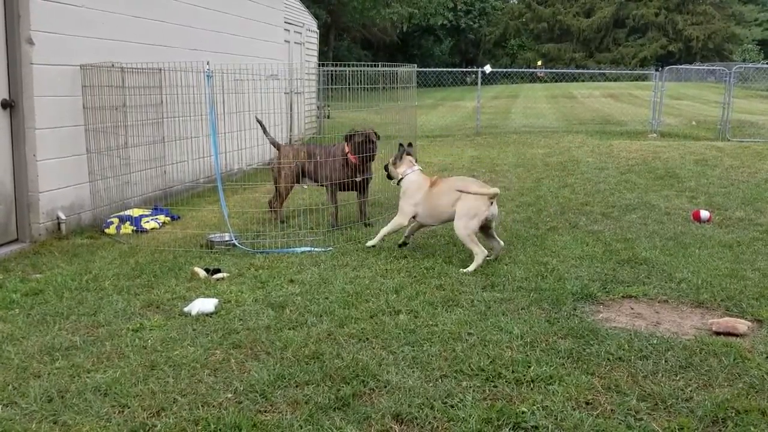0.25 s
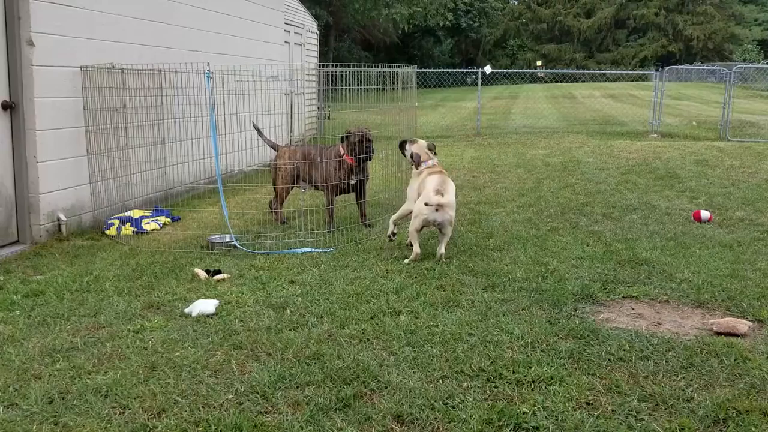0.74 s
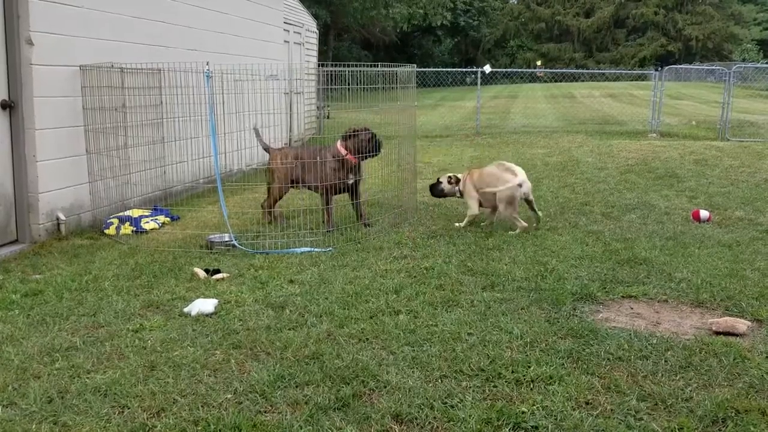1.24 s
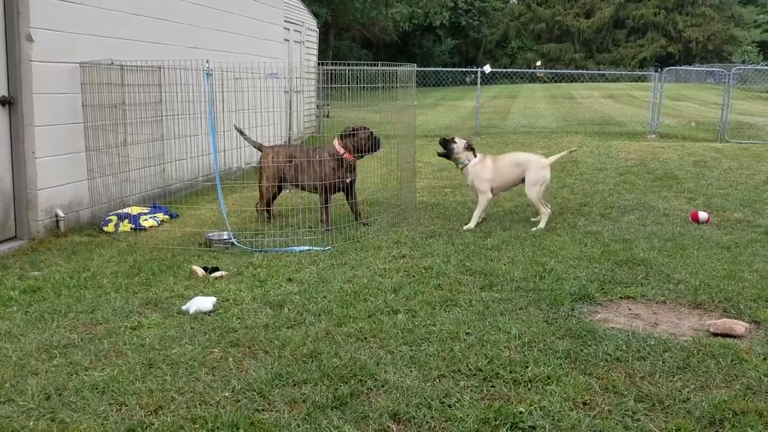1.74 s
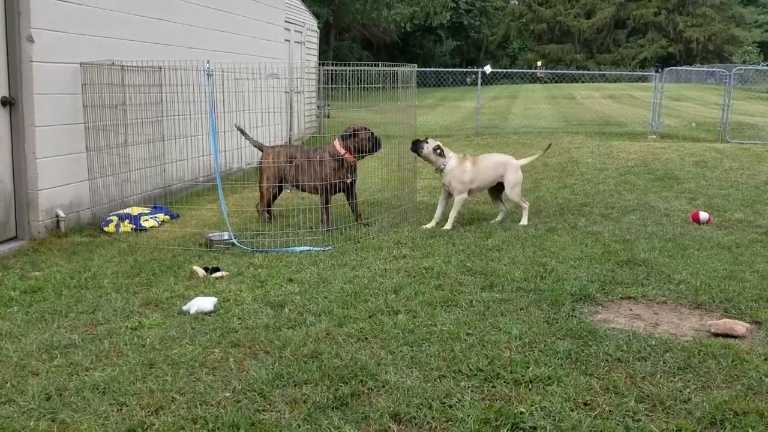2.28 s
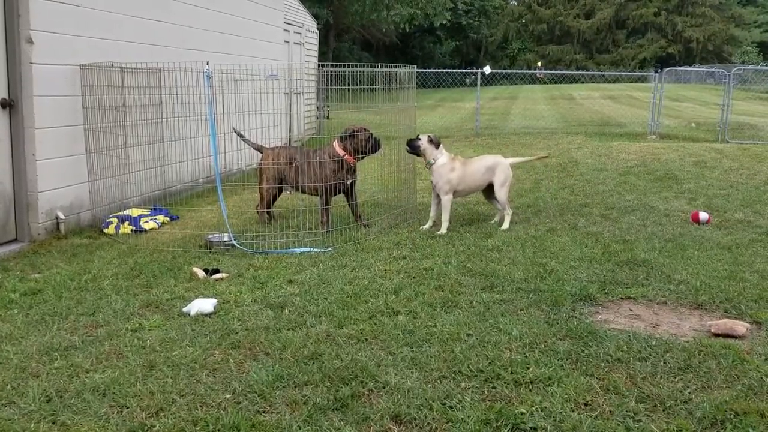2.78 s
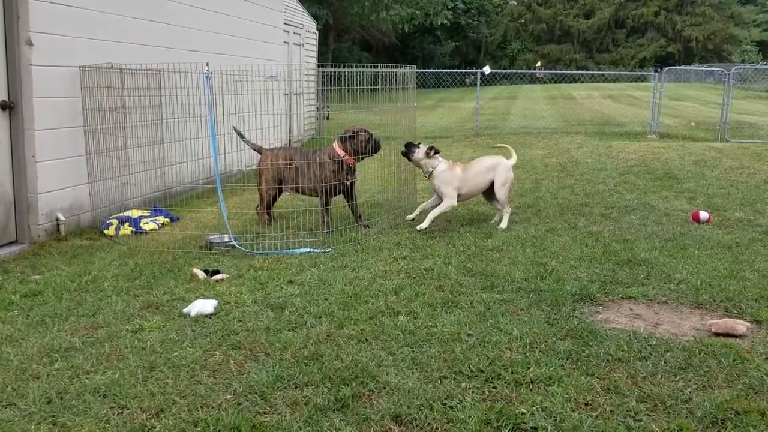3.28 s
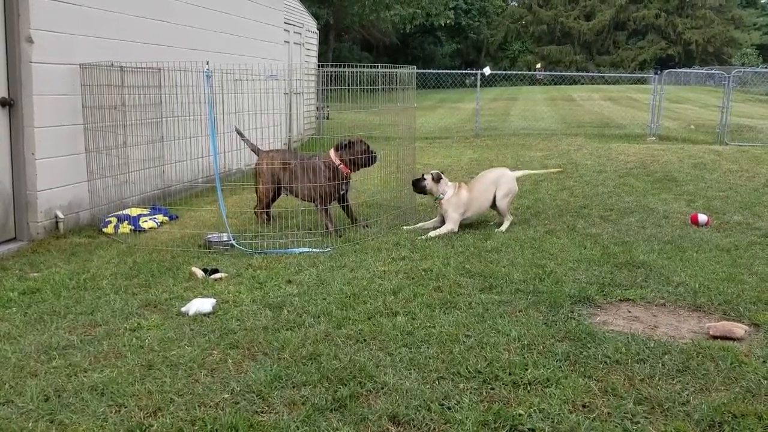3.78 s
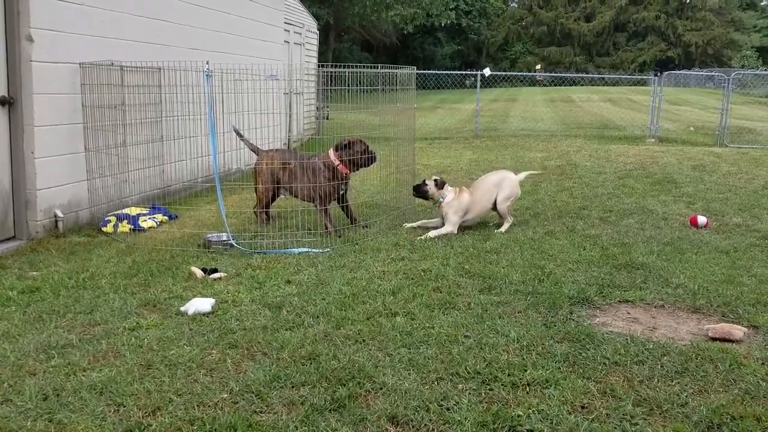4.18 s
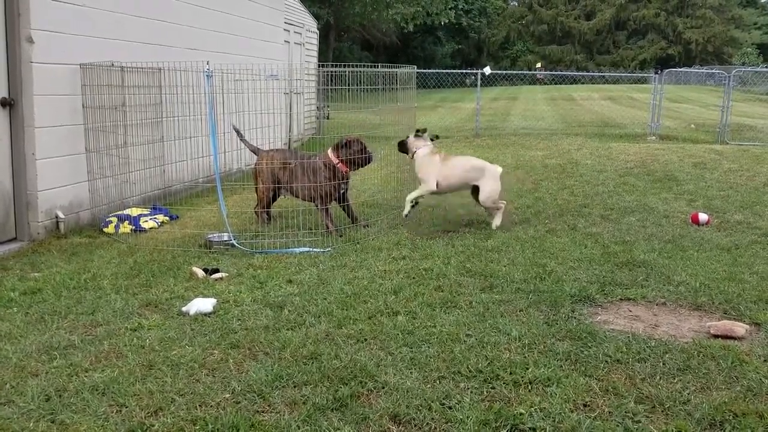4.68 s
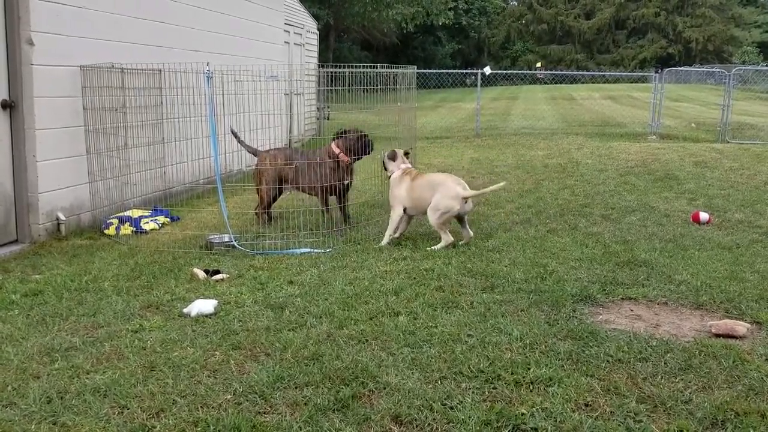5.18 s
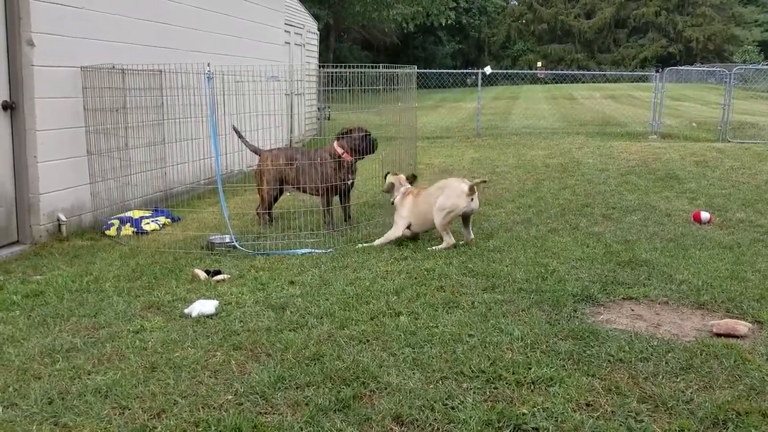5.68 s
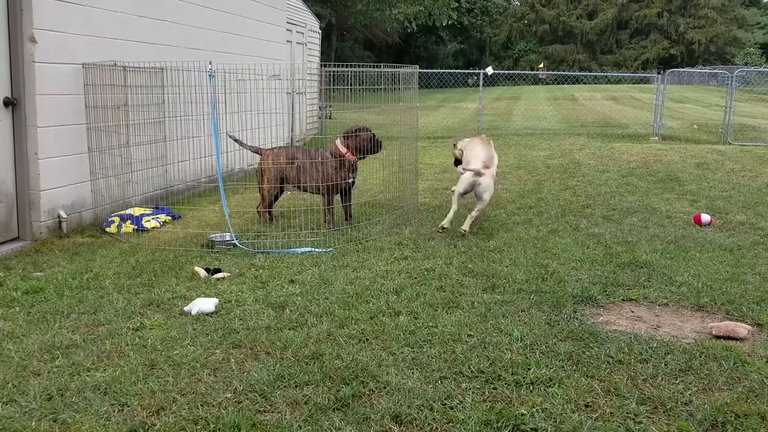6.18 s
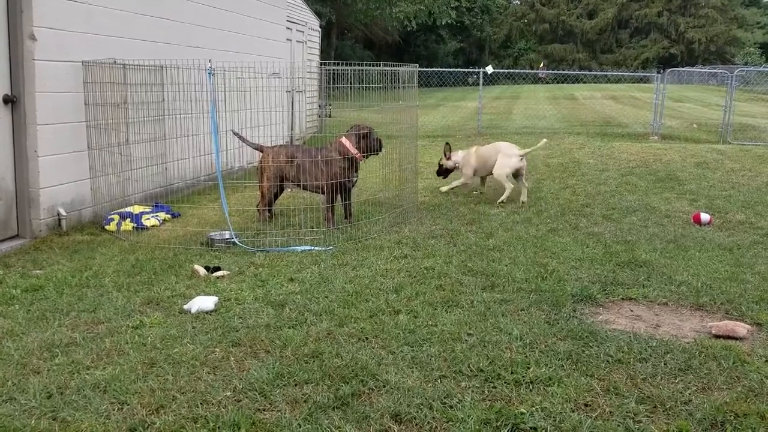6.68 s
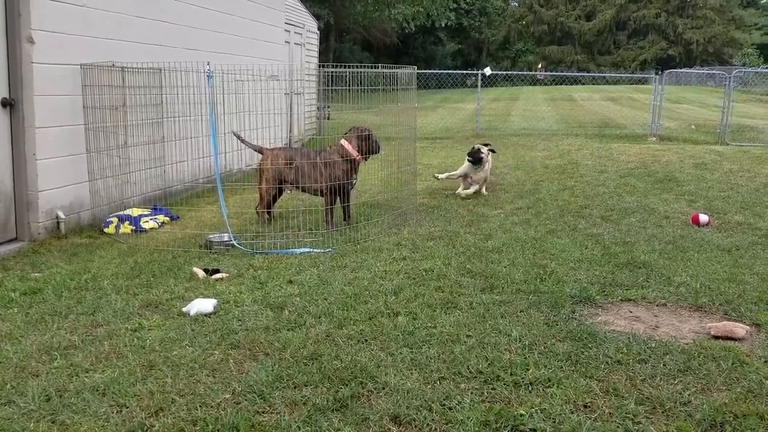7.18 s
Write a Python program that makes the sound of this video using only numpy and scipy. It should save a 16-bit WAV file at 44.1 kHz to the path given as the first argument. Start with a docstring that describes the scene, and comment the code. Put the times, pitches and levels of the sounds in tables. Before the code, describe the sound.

A large dog gives three deep, loud barks about a second apart in an open yard, echoing off trees over faint chirping birds.

```python
"""Grassy yard beside a shed wall: murmur, leaf hiss and a thin whine; a small bird chirps in threes, dogs huff.
A large dog barks three times: each bark opens as chaotic rasp and settles into a ringing harmonic note.
Wall, fence and trees throw the barks back. Paws swish through grass as bursts of grainy noise.
A jay cries in sagging harmonics, a far engine's noise rumble swells, and late on the whine weakens."""
import sys
import numpy as np
from scipy import signal
from scipy.fft import rfft, irfft
from scipy.io import wavfile
from scipy.ndimage import uniform_filter1d

SR = 44100
rng = np.random.default_rng(int(sys.argv[2]) if len(sys.argv) > 2 else 0)


def wrap_up_sound(samples):
    """Save the sound to the file named by the first command line argument, as 16-bit audio."""
    columns = np.atleast_2d(samples).T
    # keep every value between -1 and 1, then stretch to whole-number steps
    tamed = np.clip(columns, -1, 1)
    steps = np.round(tamed * 32767).astype(np.int16)
    wavfile.write(sys.argv[1], SR, steps)


N = 328104
TIME_S = np.arange(N) / SR

# left-right likeness of sound from all around: freq_hz, likeness [0-1]
LIKENESS = [(30, 0.9), (70, 0.92), (170, 0.98), (380, 0.85), (950, 0), (2400, 0), (6000, 0)]
# outdoor murmur: freq_hz, relative_db_per_hz; then time_s, level_db
MURMUR_COLOUR = [(20, -28.5), (40, -7), (62, -15.5), (80, -15), (106, 0), (135, -18.5), (185, -3.5),
                 (255, 3.5), (330, -6), (480, -8.5), (760, -13.5), (1050, -22), (2500, -32.5),
                 (4000, -54.5)]
MURMUR_LEVEL = [(0, -46), (1.4, -49), (2.8, -56), (4, -48.5), (7.44, -48)]
# leaf hiss: freq_hz, relative_db_per_hz; then time_s, level_db
HISS_COLOUR = [(500, -3.5), (2500, 0), (3500, 0), (6000, -2), (8100, -1), (9200, -10.5), (12700, -9),
               (13600, -18), (15500, -14.5)]
HISS_LEVEL = [(0, -62), (2.7, -67.5), (3.5, -66.5), (7.44, -66.5)]
# far engine: freq_hz, relative_db_per_hz; then time_s, level_db
RUMBLE_COLOUR = [(20, -31), (35, -12.5), (60, -3), (80, -10), (115, -1.5), (140, -8.5), (175, 3),
                 (215, 3.5), (275, -2), (380, -24.5), (600, -21), (1000, -34), (2500, -38), (4000, -62.5)]
RUMBLE_LEVEL = [(1.5, -59), (1.61, -52), (2.14, -42), (2.87, -45), (3.73, -35.5), (5.37, -37.5), (5.7, -38),
                (6.73, -39), (7.44, -38)]

# small bird's three-note phrases: first_note_s
PHRASES = [.096, 0.605, 1.083, 1.509, 2.08, 2.691, 3.275, 3.798, 4.173, 4.607, 5.061, 5.538, 6.022, 6.502,
           7.023]
# notes of a phrase: after_first_s, top_pitch_hz, relative_db
NOTES = [(0, 4670, -12), (0.049, 4760, -5.5), (0.099, 4800, -4.5)]
# slow drift of the song: time_s, level_db
SONG_LEVEL = [(0, -50), (2.8, -55), (4.5, -51), (7.44, -53.5)]

# dogs' huffs: peak_s, length_s, resonance_hz, width_hz, level_db
HUFFS = [(0.13, 0.033, 1220, 129, -52.5), (0.297, .16, 1110, 130.4, -55), (1.711, 0.17, 1015, 153.5, -55),
         (4.11, .1, 1075, 127.5, -58), (4.992, .08, 1086, 70, -48), (6.251, .12, 1384, 294, -55),
         (6.668, .12, 2200, 780, -55), (7.035, .1, 1620, 350, -48.5)]

# barks: start_s; then, from start, voice_full_s, rasp_clears_s, mouth_widest_s, voice_stops_s, rasp_full_s;
# top_pitch_hz, voice_db, rasp_db, open_mouth_lift_db, open_brightness_db,
# upper resonance: in_rasp_hz, in_note_hz
BARKS = [(.972, 0.047, .067, .09, .13, .04, 473.2, -9.5, -17, 14.6, 9.2, 1728, 1440),
         (2.123, .043, .066, .089, .104, .028, 483, -17.5, -15.5, 23.5, 20.2, 1568, 2350),
         (3.173, .039, .04, .082, 0.11, .022, 459, -13.5, -21.5, 10.5, 6.1, 1357, 1398)]
# throat colour on the harmonics: freq_hz, gain_db
THROAT = [(450, -2), (900, -10), (1380, -15.5), (1820, -29.5), (2300, -23.5), (2750, -37), (3250, -34),
          (3700, -45), (4500, -54.5), (6000, -48), (8000, -49.5), (9500, -58.5), (15000, -59)]
# throat colour on the rasp: freq_hz, gain_db
RASP_COLOUR = [(100, -20), (250, -17), (430, -0.5), (620, 4.5), (800, 5.5), (1200, 7), (1750, 1.5),
               (2050, -4), (2550, 1), (3100, -21), (4500, -45), (6000, -20.5), (8000, -30), (9500, -49.5),
               (15000, -51)]
# two microphone ports, for sound from the dogs: freq_hz, left_lead_rad
PORT_PHASE = [(0, -0.5), (450, .45), (700, 1.5), (950, .7), (1200, 1.56), (1550, 2.4), (1800, 4.5),
              (2400, 4.5), (2900, 5.5), (4000, 7.5), (6000, 9), (8000, 7), (15000, 26.5)]
# same ports: freq_hz, left_minus_right_db
PORT_BALANCE = [(200, 1), (700, 0), (1300, 0), (1800, 6.5), (2400, 2.5), (4400, -0.5), (8000, 5.5),
                (15000, -4)]
# single reflections: delay_s, left_db, right_db
ECHOES = [(0.0122, -18, -34), (0.027, -42, -32), (.098, -29, -39.5)]
# near scatter: freq_hz, level_db; then freq_hz, t60_s
NEAR_COLOUR = [(200, -31), (450, -21.5), (950, -17), (1500, -17), (2400, -3.5), (7000, -4), (15000, -5)]
NEAR_T60 = [(300, 0.75), (2400, 0.19), (12000, 0.093)]
# far trees: freq_hz, level_db; then freq_hz, t60_s
TREES_COLOUR = [(200, -35.5), (450, -31), (950, -29.5), (1400, -28.5), (1900, -20), (2400, -16),
                (3200, -21), (8000, -17.5)]
TREES_T60 = [(300, 1.8), (1000, 1.5), (2400, 1.08), (8000, 0.64)]
# share aimed at the trees as the dog turns its head: time_s, gain_db
AIM = [(1.1, -5.5), (2.2, -1.5), (3.2, 2.5)]

# paws through grass: start_s, peak_db, t60_s
SWISHES = [(1.11, -61.5, 0.52), (3.295, -58, 0.43), (4.768, -57.5, 0.53), (4.98, -63, 0.77),
           (5.126, -62.5, 0.36), (5.59, -46, 1), (5.652, -43.5, 0.39), (5.952, -63, 0.32),
           (6.355, -69, .44), (7.035, -62, 0.2)]
# grass noise: freq_hz, relative_db_per_hz
GRASS_COLOUR = [(500, -10), (1500, -8), (3500, -12.5), (5000, -11.5), (6500, -4), (8200, -3), (9500, -12),
                (13000, -3.5), (15500, -19.5)]

# jay calls: start_s, length_s, pitch_before_bend_hz, end_level_db, lift_above_third_partial_db
JAYS = [(1.72, 0.26, 993, -62.5, -4), (2.055, 0.24, 980, -66, 1), (4.235, 0.25, 980, -59, 4.5),
        (4.575, 0.25, 966, -58.5, 7.5), (4.87, .174, 975, -71, 11), (5.73, .21, 1105, -71.5, -12),
        (6.03, 0.17, 1166, -75, -2)]
# jay partials: multiple, relative_db
JAY_PARTIALS = [(2, -13), (3, 0), (4, -9.5), (5, -19), (7, -26), (8, -23)]

# mouth: opens and shuts once a bark
OPEN_S, SHUT_S = .016, .028
OPEN_DIP_DB, SHUT_MOUTH_DB, SHUT_DULL_DB = 4.5, 18, 20
# pitch: scoop and sag are shares of the top pitch
PITCH_RISE_S, PITCH_SCOOP = .036, .1
PITCH_SAG, SAG_S = .11, .018
PITCH_WOBBLE, WOBBLE_HZ = .011, 55
# voice
VOICE_RISE_DB_PER_S, RELEASE_DB_PER_S, RELEASE_S = 899.5, 896.5, .04
# rasp: surges briefly at the moment it begins to clear, then drops to breath
SURGE_DB, SURGE_S, RASP_RISE_POWER = 4.5, .006, 1.2
CLEAR_DB_PER_S, BREATH_DB, BREATH_FADE_DB_PER_S = 799.5, -16.5, 250
GLIDE_S = .017  # upper resonance, rasp to note
SWISH_RISE_S = .018
EDGE_HZ = 15720


def gain_of(db):
    """Decibels to amplitude."""
    return 10 ** (np.asarray(db) / 20)


def evened(x):
    """Scales to rms 1."""
    return x / np.sqrt(np.mean(x ** 2) + 1e-20)


def read(points, hz):
    """Reads a table on a log-frequency axis."""
    f_hz, value = np.transpose(points)
    return np.interp(np.log(hz + 1), np.log(f_hz + 1), value)


def level_at(points, time_s):
    """Reads a level table on a linear time axis."""
    return np.interp(time_s, *np.transpose(points))


def add(mix, start_s, sound):
    """Mixes a sound in at its start time."""
    part = mix[max(round(start_s * SR), 0):][:len(sound)]
    part += sound[:len(part)]


def bins(x):
    """Frequencies in Hz of the spectrum of x."""
    return np.fft.rfftfreq(x.shape[-1], 1 / SR)


def coloured(x, points):
    """Filters by a freq_hz, gain_db table."""
    return irfft(rfft(x) * gain_of(read(points, bins(x))), x.shape[-1])


def wander(size, hz):
    """Random drift of rms about 1, rolled off above hz."""
    x = rng.standard_normal(size + SR // 4)
    return evened(irfft(rfft(x) / (1 + (bins(x) / hz) ** 4), len(x)))[:size]


def sine(hz):
    """Sine that follows a pitch curve."""
    return np.sin(2 * np.pi * np.cumsum(hz) / SR)


def diffuse(points):
    """Noise from all around: alike in both ports in the bass, less so in the treble."""
    a, b = rfft(rng.standard_normal((2, N)))
    same = np.clip(read(LIKENESS, bins(TIME_S)), 0, 1)
    mid = a * np.sqrt(1 + same)
    side = b * np.sqrt(1 - same)
    return evened(coloured(irfft(np.array([mid + side, mid - side]), N), points))


def tail(x, colour, t60, build_s):
    """Scattered reflections that build up, then die band by band."""
    noise = diffuse([(20, 0), (20000, 0)])[:, :2 * SR]
    hz, t, bands = signal.stft(noise, SR, nperseg=256)
    fade = gain_of(-60 * t / read(t60, hz)[:, None]) * (1 - np.exp(-(t / build_s) ** 2))
    fade /= np.sqrt((fade ** 2).sum(1, keepdims=True) * t[1] * SR)  # equal energy per band
    bands = bands * fade * gain_of(read(colour, hz))[:, None]
    response = signal.istft(bands, SR, nperseg=256)[1]
    return signal.fftconvolve(x[None], response, axes=1)[:, :N]


def background(whine_hz=1400, whine_db=-71):
    """Murmur, leaf hiss and far engine as drifting coloured noise, plus a wavering sine whine."""
    layers = ((MURMUR_COLOUR, MURMUR_LEVEL), (HISS_COLOUR, HISS_LEVEL), (RUMBLE_COLOUR, RUMBLE_LEVEL))
    beds = np.zeros((2, N))
    for colour, level in layers:
        level_db = level_at(level, TIME_S) + 1.5 * wander(N, 4.1)
        beds += diffuse(colour) * gain_of(level_db)
    whine = sine(whine_hz + 14 * wander(N, 34)) * gain_of(whine_db + .93 * wander(N, 6.9))
    return beds + whine * np.interp(TIME_S, [5.3, 6.3], [1, .3])


def small_bird(note_s=.036, fall_hz=600):
    """Short chirps in threes: each peaks in pitch a quarter through, then falls."""
    out = np.zeros(N)
    u = np.linspace(0, 1, round(note_s * SR))
    for phrase_s in PHRASES:
        song_db = level_at(SONG_LEVEL, phrase_s)
        for after_s, top_hz, note_db in NOTES:
            hz = top_hz * (1 + .012 * wander(len(u), 300)) - fall_hz * ((u - .25) / .75) ** 2
            level_db = song_db + note_db + rng.standard_normal()
            swell = np.sin(np.pi * u) ** 2 * gain_of(level_db)
            add(out, phrase_s + after_s - .59 * note_s, swell * sine(hz))
    return out


def huffs():
    """Voiceless puffs: breath noise through the resonance of a dog's open mouth."""
    out = np.zeros(N)
    for peak_s, length_s, hz, width_hz, level_db in HUFFS:
        air = rng.standard_normal(round(length_s * SR))
        f_hz = bins(air)
        mouth = 1 / np.hypot(1, (f_hz - hz) / width_hz) / (1 + (f_hz / 2900) ** 6)
        puff = evened(irfft(rfft(air) * mouth, len(air))) * np.hanning(len(air))
        add(out, peak_s - length_s / 2, gain_of(level_db) * puff)
    return out


def gesture(t, full_s, clear_s, widest_s, stop_s, swell_s,
            top_hz, voice_db, rasp_db, mouth_db, bright_db, rasp_hz, note_hz):
    """One push of breath and one opening of the mouth set every control of a bark."""
    late_s = t - widest_s
    over_s = np.maximum(t - stop_s, 0)
    opening = np.exp(-(late_s / np.where(late_s < 0, OPEN_S, SHUT_S)) ** 2)
    shut = 1 - opening

    # pitch climbs as the mouth opens, sags as breath gives out
    scoop = PITCH_SCOOP * (1 - np.exp(-(np.minimum(late_s, 0) / PITCH_RISE_S) ** 2))
    sag = PITCH_SAG * (1 + np.tanh((t - stop_s) / SAG_S)) / 2
    pitch_hz = top_hz * (1 - scoop - sag)

    onset = VOICE_RISE_DB_PER_S * np.maximum(full_s - t, 0)
    voice = voice_db - onset - OPEN_DIP_DB * opening - RELEASE_DB_PER_S * over_s

    swell = RASP_RISE_POWER * 20 * np.log10(np.minimum((t + 1 / SR) / swell_s, 1))
    surge = SURGE_DB * np.exp(-((t - clear_s) / SURGE_S) ** 2)
    clearing = np.maximum(-CLEAR_DB_PER_S * np.maximum(t - clear_s, 0), BREATH_DB)
    rasp = rasp_db + swell + surge + clearing - BREATH_FADE_DB_PER_S * over_s

    ring_hz = rasp_hz + (note_hz - rasp_hz) * (1 + np.tanh((t - clear_s) / GLIDE_S)) / 2
    mouth = mouth_db - SHUT_MOUTH_DB * shut
    bright = bright_db - SHUT_DULL_DB * shut
    return pitch_hz, voice, mouth, bright, rasp, ring_hz


def resonate(x, hz, width_hz):
    """A moving resonance: shifts hz to zero, low-passes, shifts back."""
    turn = np.exp(2j * np.pi * np.cumsum(hz) / SR)
    r = np.exp(-np.pi * width_hz / SR)
    return 2 * (turn * signal.lfilter([1 - r], [1, -r], x / turn)).real


def bark(full_s, clear_s, widest_s, stop_s, *tone,
         mouth_hz=920, mouth_width_hz=270, ring_width_hz=170, ring=3, ring_db=9):
    """Vocal folds start in chaos and settle into a clear note, coloured by throat and opening mouth."""
    t = np.arange(0, stop_s + RELEASE_S, 1 / SR)
    pitch_hz, voice_db, mouth_db, bright_db, rasp_db, ring_hz = gesture(
        t, full_s, clear_s, widest_s, stop_s, *tone)

    chaos = 1 / (1 + gain_of(voice_db + mouth_db / 2 - rasp_db) ** 2)  # share of rasp
    jitter = (.006 + .03 * chaos) * wander(len(t), 260)
    shimmer = 1 + .3 * chaos * wander(len(t), 200)
    wobble = PITCH_WOBBLE * wander(len(t), WOBBLE_HZ)
    turns = np.cumsum(pitch_hz * (1 + jitter + wobble)) / SR

    k = np.arange(1, 33)[:, None]
    hz = k * pitch_hz
    mouth = mouth_db * np.exp(-((hz - mouth_hz) / mouth_width_hz) ** 2)
    ringing = ring_db / (1 + ((hz - ring_hz) / ring_width_hz) ** 2)  # picks out a harmonic
    # harder closure lifts the upper harmonics
    pressed = bright_db * np.interp(hz, [1000, 1900, 2500, 3400, 6000, 8000, 11000],
                                    [.034, 1, .8, .72, 1, 1, .45])
    # upper harmonics flutter, each on its own
    drifts = np.array([wander(len(t), 50) for _ in k])
    flutter = 3 * np.clip((hz - 1400) / 1500, 0, 1) * drifts
    levels_db = read(THROAT, hz) + mouth + ringing + pressed + flutter
    partials = gain_of(levels_db) * np.cos(2 * np.pi * (k * turns + rng.random(k.shape)))
    voice = np.sqrt(2) * partials.sum(0) * shimmer

    puffs = (.86 + np.exp(-(turns % 1) / .13)) * rng.standard_normal(len(t))  # air once a cycle
    rasp = coloured(puffs, RASP_COLOUR)
    rasp = rasp + ring * resonate(rasp, ring_hz, ring_width_hz)
    rasp /= np.sqrt(uniform_filter1d(rasp ** 2, size=500))  # lung pressure holds it steady
    mixed = gain_of(voice_db) * voice + gain_of(rasp_db) * rasp
    return mixed * signal.windows.tukey(len(t), .04)


def dog():
    """The three barks, each from its own gesture."""
    out = np.zeros(N)
    for start_s, *shape in BARKS:
        add(out, start_s, bark(*shape))
    return out


def ports(x):
    """The camera body delays and shades sound on its way to the two ports."""
    hz = bins(x)
    half = np.exp(.5j * read(PORT_PHASE, hz)) * gain_of(read(PORT_BALANCE, hz) / 2)
    return irfft(rfft(x) * np.array([half, 1 / half]), N)


def yard(x):
    """Direct sound, slaps from wall and fence, near scatter and the long answer of the trees."""
    slaps = np.zeros((2, N))
    for delay_s, left_db, right_db in ECHOES:
        delayed = np.pad(x, (round(delay_s * SR), 0))[:N]
        slaps += gain_of([[left_db], [right_db]]) * delayed
    near = tail(x, NEAR_COLOUR, NEAR_T60, build_s=.0042)
    aimed = x * gain_of(level_at(AIM, TIME_S))
    trees = tail(aimed, TREES_COLOUR, TREES_T60, build_s=.037)
    return ports(x) + slaps + near + trees


def swishes():
    """Grass blades flick against paws: a quick rise and a grainy fade."""
    power = np.zeros(N)
    for start_s, peak_db, t60_s in SWISHES:
        age_s = np.maximum(TIME_S - start_s, 0)
        fade_db = -60 * np.maximum(age_s - SWISH_RISE_S, 0) / t60_s
        rise = np.minimum(age_s / SWISH_RISE_S, 1)
        power += gain_of(peak_db + fade_db) ** 2 * rise ** 2
    grains = gain_of(2.5 * wander(N, 500))
    return np.sqrt(power) * evened(diffuse(GRASS_COLOUR) * grains)


def jay(sag=.063, scoop=.46, fade_db=-4):
    """Nasal cry: unsteady harmonics whose pitch scoops up and sags."""
    out = np.zeros(N)
    for start_s, length_s, pitch_hz, end_db, lift_db in JAYS:
        u = np.linspace(0, 1, round(length_s * SR))
        bend = 1 - scoop * np.exp(-u / .045) - sag * u ** 1.7
        hz = pitch_hz * (bend + .011 * wander(len(u), 250))
        cry = np.zeros(len(u))
        for k, partial_db in JAY_PARTIALS:
            drift_db = 3 * wander(len(u), 15)
            cry += gain_of(partial_db + drift_db + lift_db * (k > 3)) * sine(k * hz)
        envelope = gain_of(end_db + fade_db * (u - 1)) * signal.windows.tukey(len(u), .3)
        add(out, start_s, envelope * evened(cry))
    return out


def birds(wet_db=-7):
    """Both birds, direct and with scattered reflections."""
    calls = small_bird() + jay()
    return calls + tail(calls, [(2000, wet_db), (8000, wet_db)], [(3000, .44), (8000, .4)], build_s=.035)


def scene():
    """Everything in the yard, at the two ports."""
    return background() + birds() + yard(huffs() + dog()) + swishes()


def record(dry):
    """The recorder's band limit: a linear-phase low-pass."""
    lowpass = signal.firwin(511, EDGE_HZ, window=("kaiser", 9), fs=SR)
    return signal.oaconvolve(dry, lowpass[None], "same")


dry = scene()
out = record(dry)
wrap_up_sound(out)
```